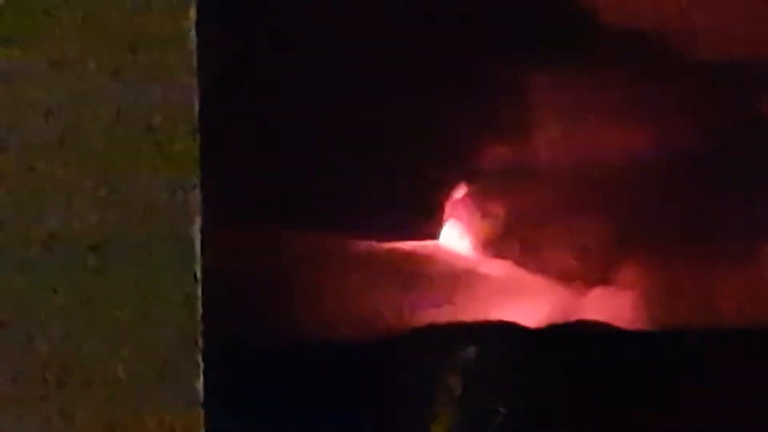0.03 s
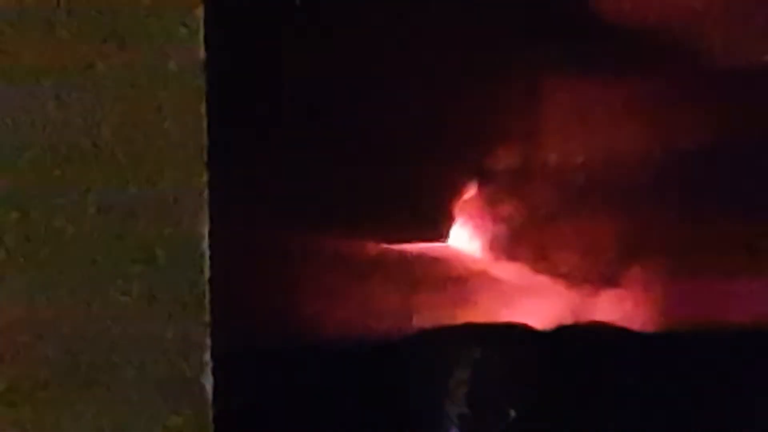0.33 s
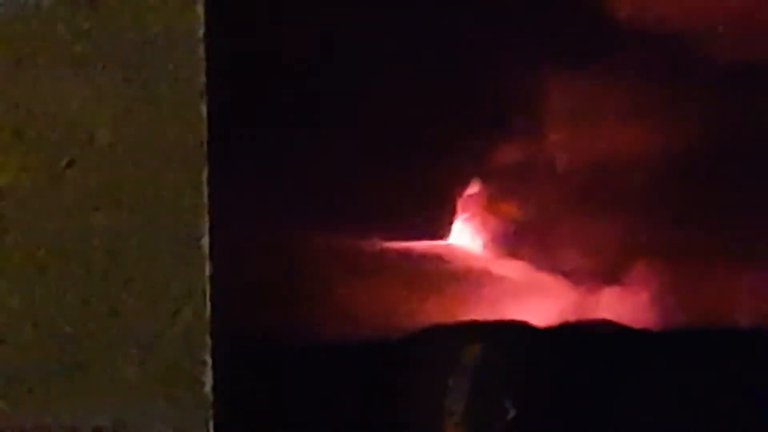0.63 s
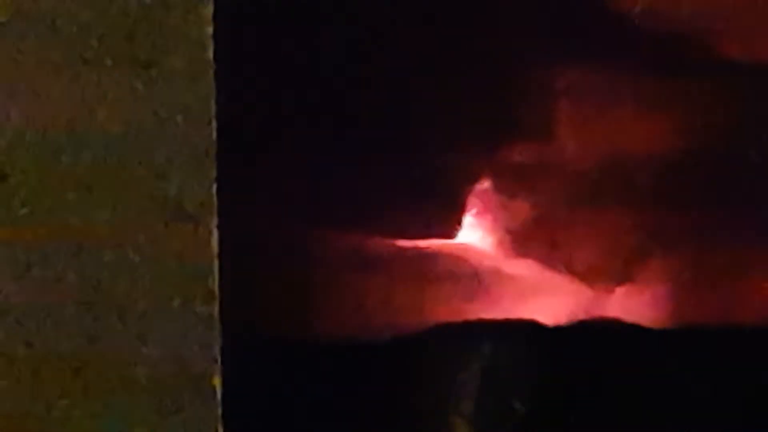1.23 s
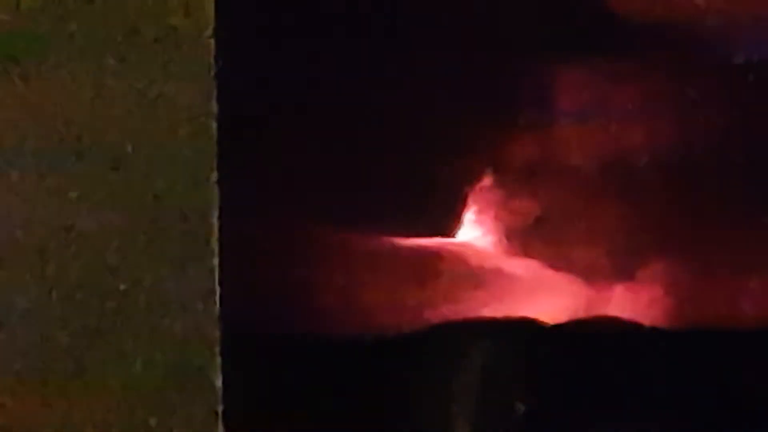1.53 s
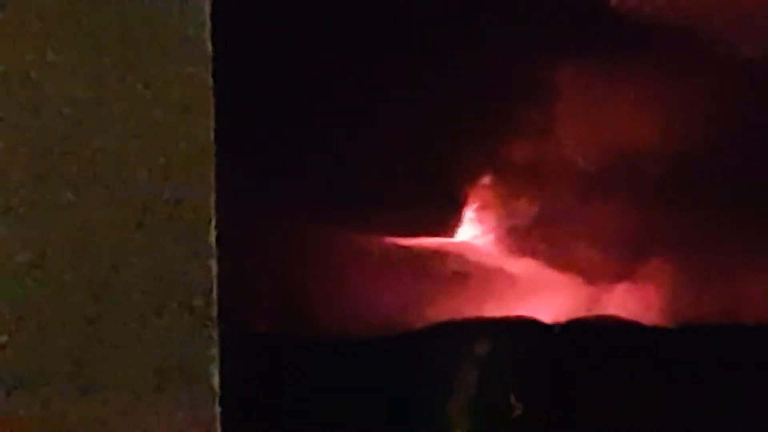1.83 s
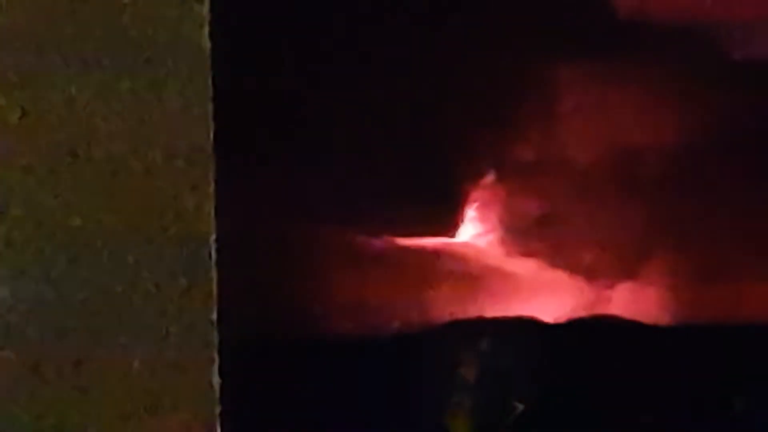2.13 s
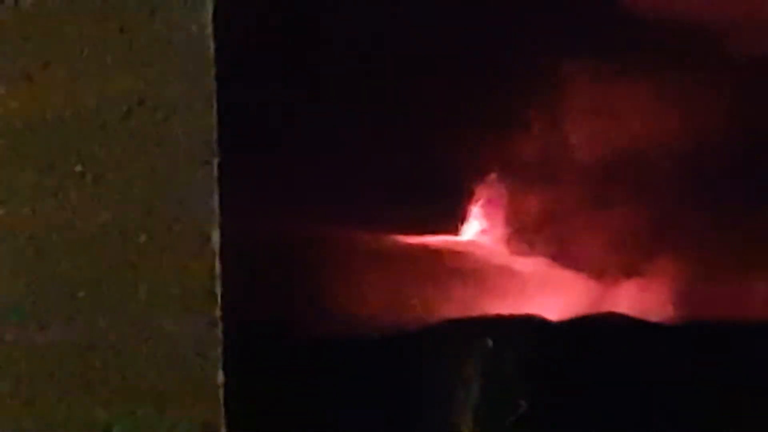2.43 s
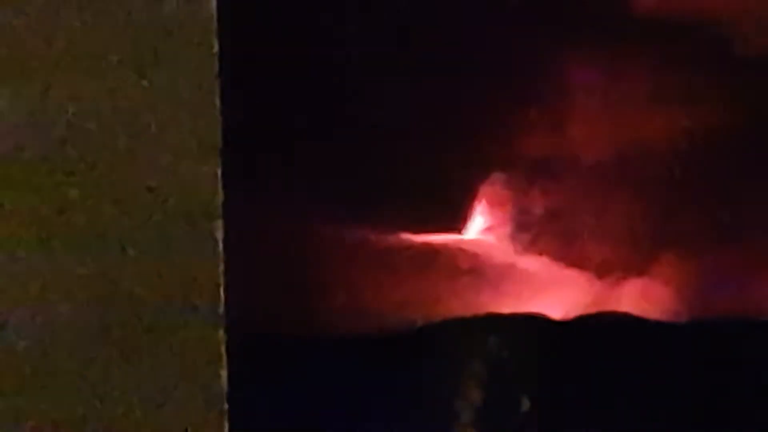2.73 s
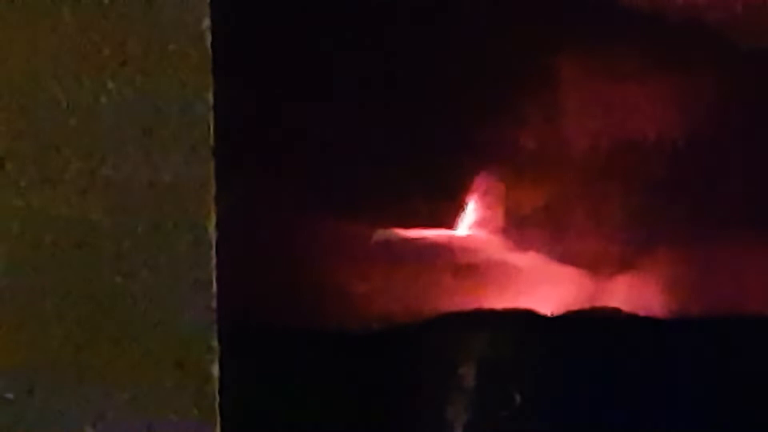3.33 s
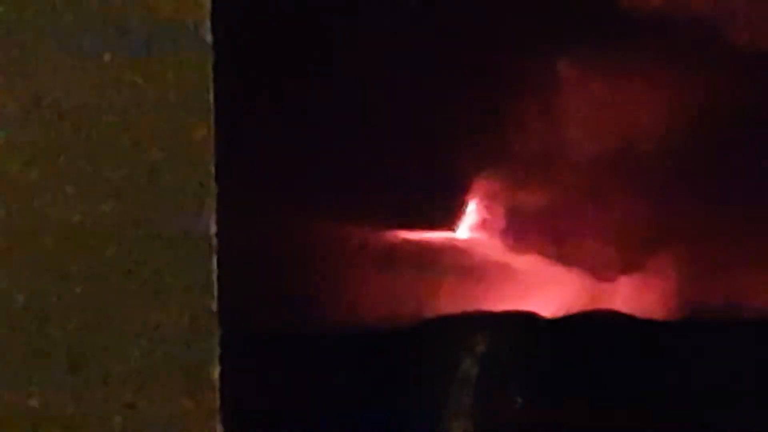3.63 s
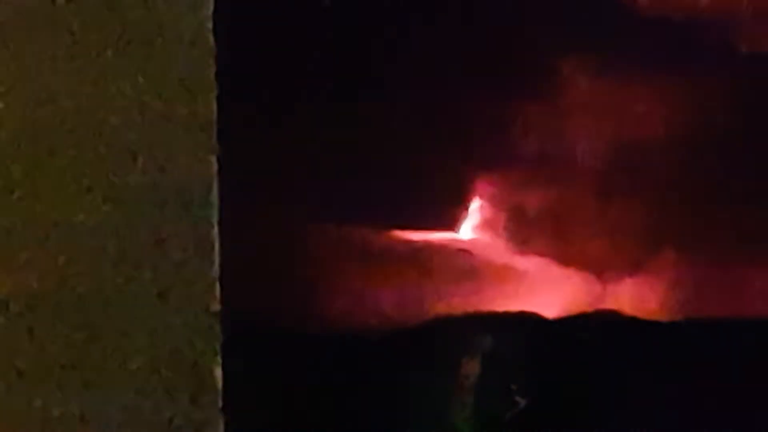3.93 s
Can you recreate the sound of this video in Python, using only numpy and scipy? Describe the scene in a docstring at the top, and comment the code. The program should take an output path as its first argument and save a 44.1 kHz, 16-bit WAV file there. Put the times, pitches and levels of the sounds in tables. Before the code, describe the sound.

The deep rumble of a far-off erupting volcano, outdoors at night. It starts as a quiet mutter, rises suddenly to a dull, throbbing roar, then gradually subsides, while the microphone adds a faint, even hiss.

```python
"""Distant lava fountain at night

Heard from beside a house wall, the vent mutters low; then a surge of gas roars up within half a second
and slowly eases, brightest at its height. Both are jet turbulence peppered with bursting gas slugs,
their treble lost to the air on the way. A faint, steady microphone hiss lies underneath."""
import sys
import numpy as np
from scipy import signal
from scipy.fft import rfft, irfft
from scipy.io import wavfile
from scipy.ndimage import uniform_filter1d

SR = 44100
rng = np.random.default_rng(int(sys.argv[2]) if len(sys.argv) > 2 else 0)


def bounce(signal):
    """Save signal as a 16-bit WAV file at the path given by the first command-line argument."""
    frames = np.transpose(np.atleast_2d(signal))
    limited = np.clip(frames, -1, 1)
    pcm = np.round(limited * 32767).astype(np.int16)
    wavfile.write(sys.argv[1], SR, pcm)


N = 176400

# The idling vent's tone, with the wall's peaks and notches. Each row: frequency in Hz, relative level in dB.
MUTTER_EQ = [(15, -26), (30, -13), (44, -7.5), (54, 2), (64, -2), (82, -12.5), (97, -1.5), (180, -2.5),
             (202, -13), (220, -15), (240, -10.5), (290, -9.5), (340, -21), (480, -29.5), (600, -37.5),
             (800, -40.5), (1100, -65)]
# The heave of the mutter's sub and body. Each row: time in seconds, gain in dB.
MUTTER_FADER = [(0, -57.5), (.15, -57), (.24, -52), (.38, -54.5), (.5, -56.5), (.58, -55), (.645, -62.5),
                (.7, -56.5), (.78, -56), (.93, -53), (1.03, -53), (1.22, -55), (1.42, -55.5)]
# The tone of the hiss. Each row: frequency in Hz, relative level in dB.
HISS_EQ = [(590, -26), (1000, -5.5), (1220, -5.5), (1570, -7), (2110, -7.5), (2780, -7.5), (3010, -9.5),
           (5120, -13.5), (7390, -23), (8680, -18.5), (12100, -2.5), (15100, -4), (15600, -4.5)]
# The tone of the gas surge. Each row: frequency in Hz, relative level in dB.
SURGE_EQ = [(15, -34), (26, -25), (37, -15), (44, -15), (53, -4), (63, -3.5), (75, -6), (84, -15), (99, -3),
            (122, 1.5), (150, 1), (183, 0), (203, -12.5), (224, -8.5), (260, -8), (313, -11), (342, -19.5),
            (395, -20), (550, -28), (650, -36), (750, -51), (850, -55.5), (1000, -69.5), (1300, -91.5)]
# The swell of the surge's sub, body and upper edge. Each row: time in seconds, level in dB.
SURGE_SUB_FADER = [(1.4, -75), (1.481, -52.5), (1.6, -43), (1.72, -38.5), (1.83, -34.5), (1.899, -34.5),
                   (1.99, -31), (2.08, -40), (2.169, -37), (2.369, -38.5), (2.478, -42.5), (2.849, -42.5),
                   (3.201, -42), (3.331, -53), (3.502, -45.5), (3.73, -53), (3.92, -45), (4, -46.5)]
SURGE_BODY_FADER = [(1.41, -86), (1.46, -54), (1.525, -39), (1.58, -38), (1.67, -34), (1.83, -28),
                    (1.94, -26.5), (2.06, -28), (2.28, -27.5), (2.41, -32.5), (2.52, -30), (2.63, -35),
                    (2.72, -31.5), (2.91, -34.5), (3.05, -35.5), (3.28, -41), (3.4, -35.5), (3.53, -39.5),
                    (3.65, -37.5), (3.85, -41.5), (3.93, -36), (4, -40.5)]
SURGE_EDGE_FADER = [(1.44, -100), (1.53, -71), (1.62, -58.5), (1.76, -50.5), (2.04, -49.5), (2.28, -49.5),
                    (2.5, -53.5), (2.83, -59.5), (2.91, -56), (3.05, -64), (3.6, -62), (4, -66.5)]
# Scattered sound that widens the rumble. Each row: frequency in Hz, level against the direct sound in dB.
SCATTER_EQ = [(30, -22), (58, -20), (85, -12), (108, -20.5), (185, -20.5), (225, -11), (300, -17),
              (365, -6), (440, -9), (650, -6.5), (850, -3)]
# Where the rumble leans in the stereo image. Each row: frequency in Hz, left minus right in dB.
PAN_EQ = [(55, 0.5), (95, -3.5), (170, 0.5), (250, -3), (320, -0.5), (700, -1)]


def from_db(db):
    """Decibels to gain."""
    return 10 ** (np.asarray(db) / 20)


def rms_one(x):
    """Scale to rms 1."""
    return x / np.sqrt(np.mean(x ** 2) + 1e-20)


def fader(rows):
    """A fader ride as a gain at every sample."""
    return from_db(np.interp(np.arange(N) / SR, *np.transpose(rows)))


def bin_hz():
    """Frequencies of the spectrum's bins."""
    return np.maximum(np.arange(N // 2 + 1) * SR / N, 1)


def eq_db(rows):
    """An EQ curve in dB at every bin, drawn over log frequency."""
    hz, db = np.transpose(rows)
    return np.interp(np.log(bin_hz()), np.log(hz), db)


def lowpass(x, hz, order):
    """The part of a sound under a frequency."""
    return irfft(rfft(x) / (1 + (bin_hz() / hz) ** order), N)


def leveller(x, window_s=.12):
    """Even out slow chance swells; the fast throb and the mean level stay."""
    power = np.mean(x ** 2, axis=0)
    slow_power = uniform_filter1d(power, int(window_s * SR), mode="wrap")
    return x * np.sqrt(power.mean() / (slow_power + 1e-20))


def gas_jet(tone, bursts_per_s=100, burst_spread_db=2.5, burst_share=.3, sub_hz=84, edge_hz=435):
    """Turbulence and bursting gas slugs, coloured by the path: stereo sub, body and upper edge."""
    sizes = from_db(burst_spread_db * np.minimum(rng.exponential(1, N), 3))
    bursts = rms_one(sizes * (rng.random(N) < bursts_per_s / SR))
    turbulence = rng.standard_normal(N)
    direct = rfft(np.sqrt(burst_share) * (bursts - bursts.mean()) + np.sqrt(1 - burst_share) * turbulence)
    scattered = from_db(eq_db(SCATTER_EQ)) * rfft(rng.standard_normal(N))
    sides = np.array([[1], [-1]])   # opposite in left and right
    stereo = direct + sides * scattered
    colour = from_db(eq_db(tone) + sides * eq_db(PAN_EQ) / 2)
    rumble = rms_one(irfft(stereo * colour, N))
    sub = lowpass(rumble, sub_hz, order=16)
    lows = lowpass(rumble, edge_hz, order=8)
    return leveller(sub), leveller(lows - sub), leveller(rumble - lows)


def vent_mutter(edge_gain_db=-53.5):
    """The vent idles with a soft rumble, its sub and body heaving under a faint, steady upper edge."""
    sub, body, edge = gas_jet(MUTTER_EQ)
    return (sub + body) * fader(MUTTER_FADER) + edge * from_db(edge_gain_db)


def microphone_hiss(level_db=-70):
    """A bed of steady noise, each microphone its own."""
    noise = rfft(rng.standard_normal((2, N)))
    return from_db(level_db) * rms_one(irfft(noise * from_db(eq_db(HISS_EQ)), N))


def gas_surge():
    """A rush of gas roars up from the bass, then darkens as it eases."""
    bands = gas_jet(SURGE_EQ)
    rides = (SURGE_SUB_FADER, SURGE_BODY_FADER, SURGE_EDGE_FADER)
    return sum(rms_one(band) * fader(ride) for band, ride in zip(bands, rides))


def scene():
    """The volcano over the hiss."""
    return vent_mutter() + gas_surge() + microphone_hiss()


def record(dry, cutoff_hz=15720):
    """A steep high cut trims the top of the hiss."""
    return signal.sosfilt(signal.ellip(12, .1, 80, cutoff_hz, fs=SR, output="sos"), dry)


dry = scene()
out = record(dry)
bounce(out)
```